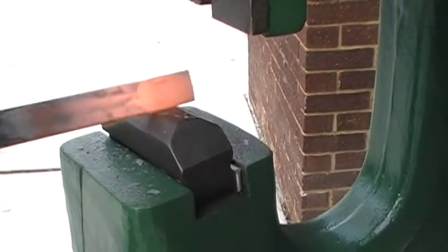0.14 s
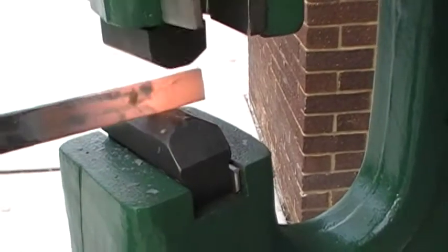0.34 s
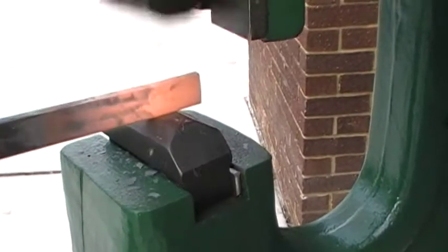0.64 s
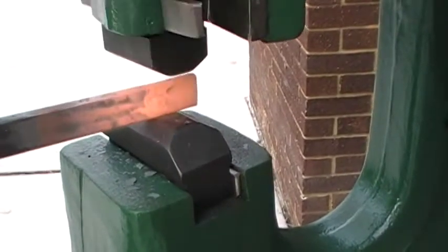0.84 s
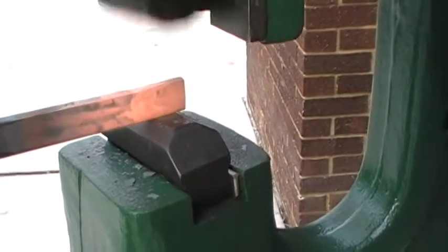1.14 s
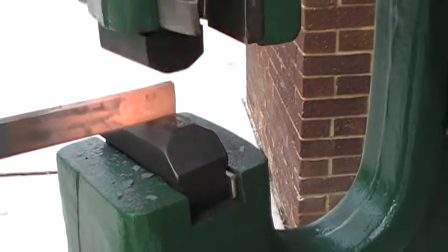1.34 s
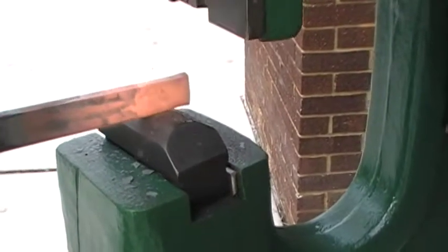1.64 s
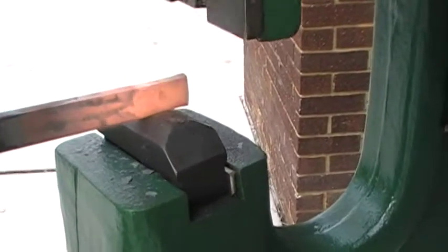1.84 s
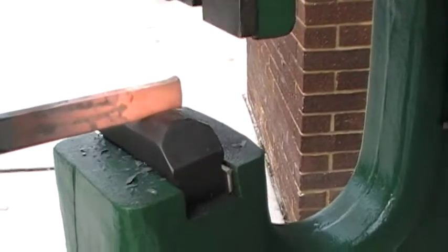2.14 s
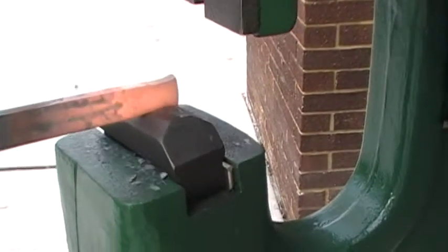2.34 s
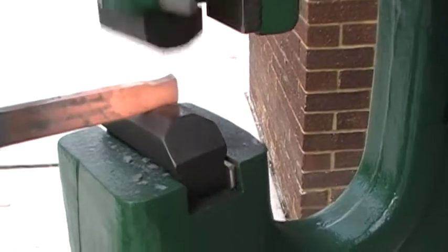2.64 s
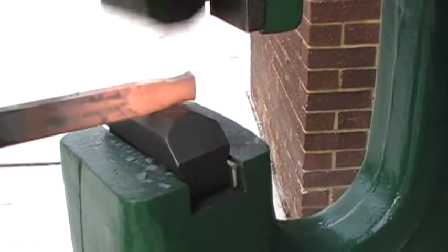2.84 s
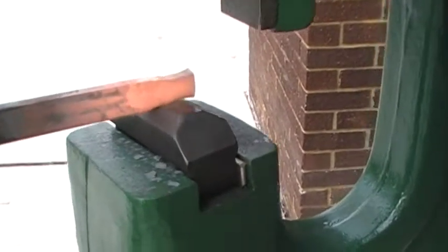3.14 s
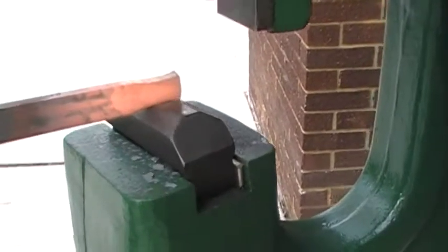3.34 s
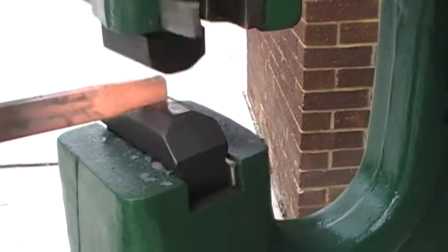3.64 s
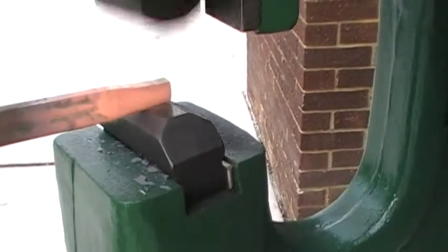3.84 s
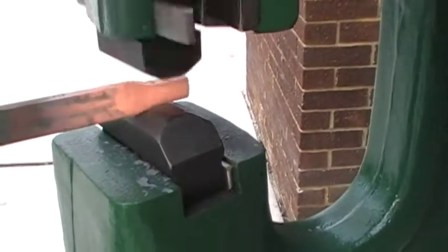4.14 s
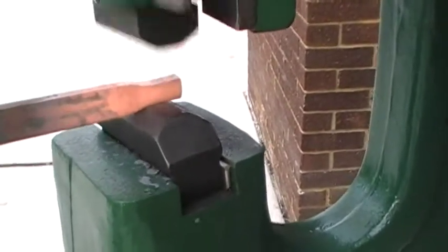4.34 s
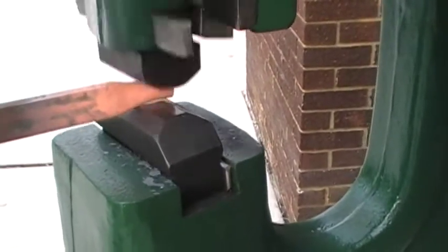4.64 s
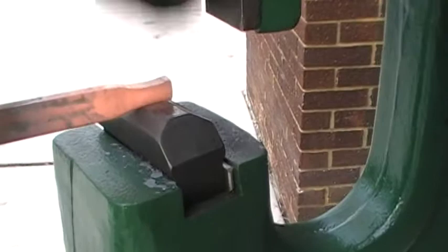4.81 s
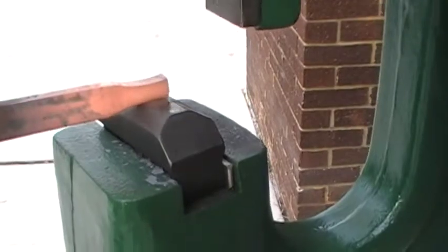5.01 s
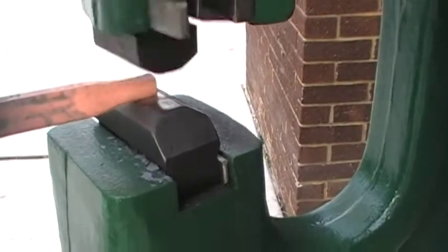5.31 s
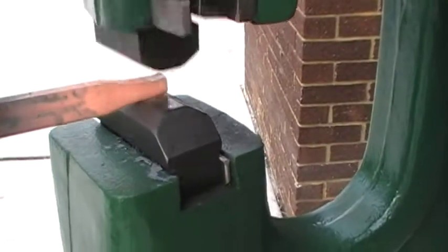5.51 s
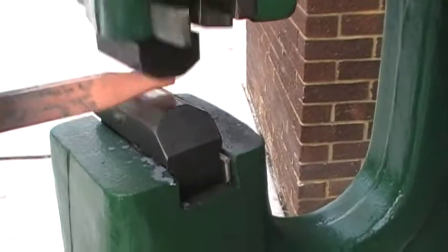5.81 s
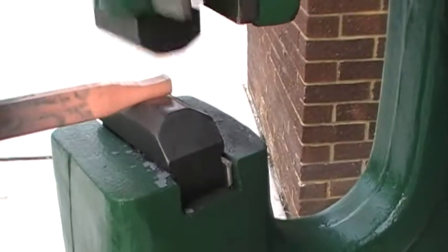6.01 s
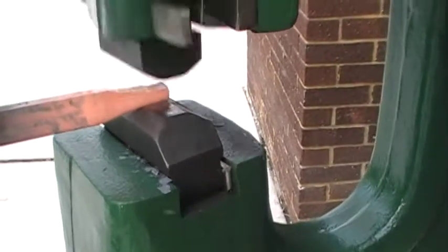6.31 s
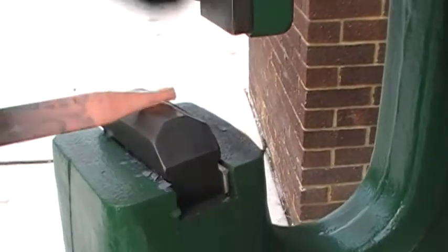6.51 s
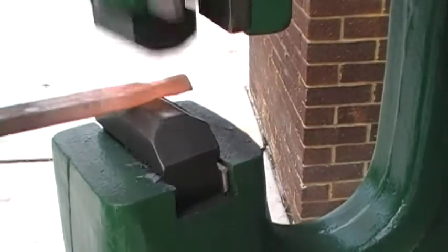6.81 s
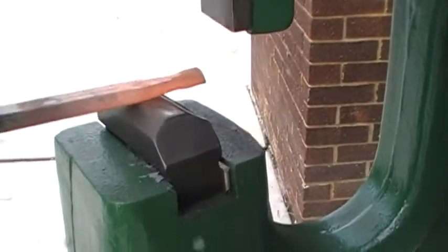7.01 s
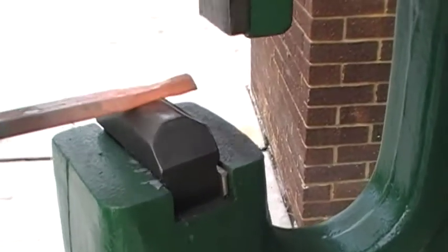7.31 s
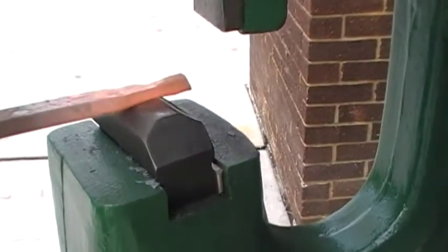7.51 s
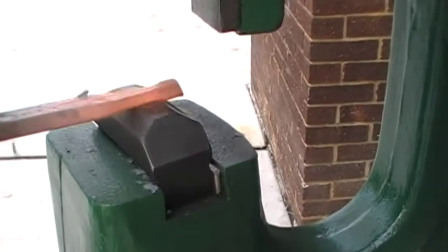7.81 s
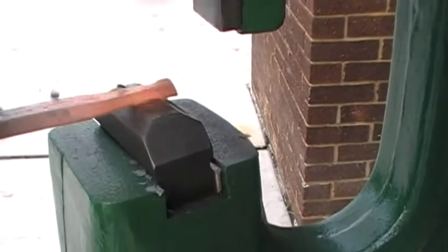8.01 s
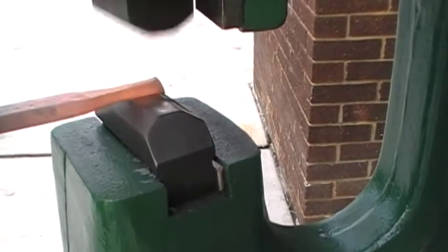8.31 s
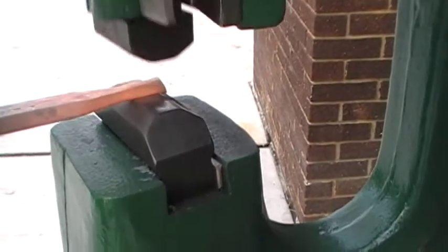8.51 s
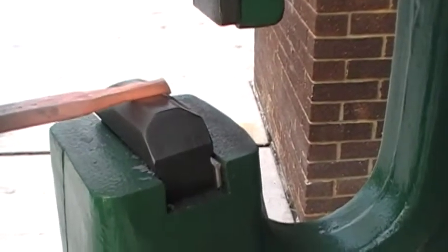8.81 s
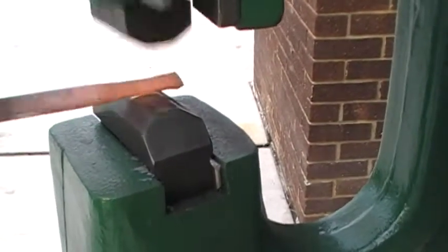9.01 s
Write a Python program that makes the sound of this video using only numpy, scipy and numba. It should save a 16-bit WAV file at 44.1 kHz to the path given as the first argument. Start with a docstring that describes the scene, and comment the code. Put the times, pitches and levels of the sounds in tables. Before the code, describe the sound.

A power hammer is already running, miked closely in stereo. From 0 to 1.5 seconds it lands about four heavy blows a second: broad, noisy metal clangs, short midrange ringing, a brief low rumble and faint hum. A lighter linkage clack comes just before each, with small rattles between. From 1.7 to 2.8 it quickens to nearly six a second and the clacks harden. It slackens around 3 to 3.5, then surges to 4.7 with louder clatter. After easing near 5.2, the longest fast run lasts from 5.5 to 8, about six blows a second, dense and clattering, with hollow low bar thuds, most frequent from 6.6. From 8 to the end near 9.2 the blows space out to four a second and clacks lighten. A muffled drive rush with ticks swells in fast runs; walls answer faintly, peaks are limited and rounded.

```python
"""A belt-driven power hammer forges a hot steel bar: each blow of the die is a noisy metal clang with ringing
frame modes, a short rumble and a hum. Between blows the linkage rattles and clacks, built from chattering noise
bursts, and the bar thuds back on the anvil as short swelling notes, mostly in the fast runs. The drive rushes and
ticks underneath and the walls answer; a close microphone limits the loud hits and rounds off their peaks."""
import sys
import numpy as np
from scipy import signal
from scipy.io import wavfile
from scipy.ndimage import uniform_filter1d, map_coordinates
from numba import njit

SR = 44100
rng = np.random.default_rng(int(sys.argv[2]) if len(sys.argv) > 2 else 0)


def gain_from_db(level_db):
    """Turn a decibel level (scalar or array-like) into a linear amplitude factor."""
    decades = np.asarray(level_db, float) / 20
    return 10 ** decades


def dump(signal):
    """Clip the signal to [-1, 1] and save it as 16-bit WAV at the path in sys.argv[1]."""
    limited = np.clip(np.atleast_2d(signal).T, -1, 1)
    pcm = np.round(limited * 32767).astype(np.int16)
    wavfile.write(sys.argv[1], SR, pcm)


N = 403515
LENGTH = SR // 4  # samples in each single hit


# The hum after a blow, changing as the bar is moved and turned.
# Each row: time in seconds, pitch in Hz, level in dB before a random scatter.
ANVIL_HUM = [(0, 240, -29), (.53, 239, -22), (1.05, 241, -26.5), (1.25, 351, -29), (1.6, 340, -40),
             (1.9, 348, -16.5), (2.35, 349, -32), (2.8, 348, -14.5), (3.3, 343, -27), (3.65, 343, -26),
             (3.9, 348, -37), (4.5, 348, -22.5), (5.2, 348, -32), (5.5, 343, -23.5), (5.9, 353, -41),
             (6.32, 348, -26), (6.44, 298, -22), (6.75, 298, -18), (7.3, 288, -38), (7.72, 294, -13),
             (8.1, 284.5, -28), (9, 270, -28)]


def anvil_hum(blow_s):
    """The anvil and bar hum on after each blow, a sine whose pitch wavers and whose phase differs left to right."""
    waver_share, waver_rate_hz = 0.01, 46
    when, *columns = np.transpose(ANVIL_HUM)
    hum_hz, hum_db = (np.interp(blow_s, when, c)[:, None, None] for c in columns)
    t = np.arange(LENGTH) / SR
    knots = rng.standard_normal((len(blow_s), 24))
    wander = np.array([map_coordinates(k, [t * waver_rate_hz]) for k in knots])[:, None]
    cycles = hum_hz * np.cumsum(1 + waver_share * wander, axis=2) / SR
    hum = np.sin(2 * np.pi * cycles + [[.3], [-.3]])
    fade_out = np.cos(np.pi / 2 * t / t[-1])
    level_db = hum_db + 3.0 * rng.standard_normal(hum_db.shape)
    return hum * fade_out * gain_from_db(level_db - 60 * t / 0.55)


# The die landing on the bar. Each row: time in seconds, clang level in dB.
DIE_BLOWS = [(0.0331, 2), (0.2726, 0.3), (0.5285, 1), (0.786, 1.5), (1.034, 0.1), (1.2763, 0.5),
             (1.5057, 2.1), (1.7167, 3), (1.9061, 2), (2.068, 3.5), (2.232, 4.5), (2.41, 4.5), (2.588, 3.5),
             (2.7725, 2.5), (2.9688, 1.1), (3.1956, -1), (3.4548, 1.5), (3.6219, -1), (3.7859, 5.5),
             (3.9518, 3.5), (4.1235, 1), (4.293, 4.5), (4.4703, 3), (4.649, 2.5), (4.8393, 4.5),
             (5.048, 0.3), (5.2901, -0.2), (5.4912, 5), (5.6449, 7), (5.8118, 6), (5.9766, 5),
             (6.1354, 4.5), (6.3, 2), (6.4555, 6.5), (6.6121, 2.5), (6.7669, 2), (6.9257, 4.5),
             (7.0862, 3.5), (7.2439, 3.5), (7.3969, 2.5), (7.5567, 3), (7.7159, 5.5), (7.868, 0.5),
             (8.0477, 1), (8.2382, .6), (8.474, 0.5), (8.7228, 2), (8.956, 1.5)]
# Colour of a hard contact. Each row: frequency in Hz, relative level in dB.
CLANG_COLOUR = [(59, -22), (100, -9.5), (1250, -0.5), (1580, -2), (1830, -1), (3050, -8.5), (8460, -12),
                (9210, -10.5), (16000, -36.5)]
# How long the clang's noise lasts. Each row: frequency in Hz, 60 dB decay time in seconds.
CLANG_DECAY = [(200, 0.22), (1000, 0.093), (3000, .12), (12000, 0.08)]
# Colour of the anvil and floor shaking. Each row: frequency in Hz, relative level in dB.
ANVIL_COLOUR = [(40, -41), (120, -14), (240, 22), (450, 22), (900, -42.5)]


def die():
    """The blow clangs through ram and frame and shakes the anvil, which answers slowly with a rumble and a hum."""
    s, db = np.transpose(DIE_BLOWS)
    t = np.arange(LENGTH) / SR
    rumble = stereo_noise((len(s), 2, LENGTH), lambda hz, _: colour(ANVIL_COLOUR, hz), size=1024)
    rumble *= gain_from_db(db - 32)[:, None, None] * gain_from_db(-60 * t / 0.044)
    slow_start = 1 - np.exp(-t / 0.011)
    thump = (rumble + anvil_hum(s)) * slow_start
    clang = contact(db, CLANG_COLOUR, CLANG_DECAY, ring_db=-15.0, slow=2.13, chatter_db=0.24)
    return place(s, clang + thump)


# Linkage clacks as the ram is thrown down. Each row: time in seconds, knock level in dB.
LINKAGE_CLACKS = [(0.209, -11.5), (0.469, -10), (0.726, -7.5), (0.979, -8), (1.224, -8), (1.456, -7.5),
                  (1.669, -8), (1.86, -5), (2.033, 0.5), (2.192, 1), (2.366, 0.5), (2.549, -1), (2.729, -3),
                  (2.923, -7.5), (3.142, -8), (3.402, -8.5), (3.583, 1.5), (3.746, 8), (3.91, 1.5),
                  (4.083, 4), (4.251, 3), (4.427, 1), (4.603, -3), (4.793, -10), (4.999, -7.5), (5.23, -9),
                  (5.447, -1), (5.607, 2), (5.768, 4), (5.934, 1), (6.096, 6), (6.257, 9), (6.414, 4.5),
                  (6.574, 3.5), (6.728, 2.5), (6.889, 1.5), (7.049, 3), (7.203, 1.5), (7.36, 2),
                  (7.517, -0.5), (7.68, 2), (7.829, -0.5), (8.004, 0), (8.191, -7), (8.418, -10),
                  (8.662, -10), (8.896, -7.5), (9.119, -10.5)]
# A stronger clack clangs more. Each row: knock level in dB, clang in dB against the knock.
CLACK_HARDNESS = [(-8.5, -11), (-25, -21), (0, 1.5), (6, 3)]
# Colour of a dull contact. Each row: frequency in Hz, relative level in dB.
KNOCK_COLOUR = [(100, -36), (308, -18), (535, -3), (1200, -3), (1720, -5.5), (2860, -10.5), (3470, -25.5),
                (4000, -23), (9610, -29), (16000, -69)]
# How long a knock's noise lasts. Each row: frequency in Hz, 60 dB decay time in seconds.
KNOCK_DECAY = [(200, 0.35), (1000, 0.14), (4000, 0.17), (12000, 0.047)]
# How long the first touch of a clack lasts. Each row: frequency in Hz, 60 dB decay time in seconds.
SNAP_DECAY = [(500, 0.025), (3000, 0.026), (10000, 0.023)]


def clacks():
    """A light clack is one crisp, ringing knock; a hard one clangs first, then its knock builds up over many
    contacts that smother the ring."""
    snap_db, snap_fades = 1, 0.85  # level, then loss per dB of hardness
    s, db = np.transpose(LINKAGE_CLACKS)
    clang_db = np.interp(db, *np.transpose(CLACK_HARDNESS))
    hard_db = clang_db + 7
    knock = contact(db, KNOCK_COLOUR, KNOCK_DECAY, ring_db=-5.5 - 0.94 * hard_db[:, None],
                    slow=0.5 * gain_from_db(1.93 * hard_db), chatter_db=1.0)
    clang = contact(db + clang_db, CLANG_COLOUR, CLANG_DECAY, ring_db=-15.0, slow=4.2, chatter_db=1.5)
    snap = contact(db + snap_db - snap_fades * hard_db, KNOCK_COLOUR, SNAP_DECAY, ring_db=-19,
                   slow=0.1, chatter_db=3.0)
    return place(s - .0015, knock) + place(s, clang) + place(s - .001, snap)


def slack_take_up():
    """The slack is taken up just before each clack, louder and brighter the faster the crank turns."""
    slow_turns = 4  # turns a second of the slow run
    turn_share, share_scatter = 0.094, .012  # how far ahead of the clack, in turns
    knock_db, knock_grows = -17, 1.6  # dB, dB per turn a second
    clang_db, clang_grows = -9, 6.6  # dB against the knock, dB per turn a second
    s, _ = np.transpose(LINKAGE_CLACKS)
    turn = np.diff(s, prepend=s[0] - 1 / slow_turns)
    faster = 1 / turn - slow_turns
    draw = rng.standard_normal((len(s), 3))
    ahead = turn * (turn_share + share_scatter * draw[:, 0])
    knock = knock_db + knock_grows * faster + 1.6 * draw[:, 1]
    clang = clang_db + clang_grows * faster + 3 * draw[:, 2]
    return np.transpose([s - ahead, knock, clang])


# Light contacts of loose linkage parts.
# Each row: time in seconds, knock level in dB, clang in dB against the knock.
LOOSE_RATTLES = [(0.009, -21, -17), (0.258, -14.5, -5), (0.344, -21, -11), (0.418, -30, 6),
                 (0.671, -21, -17), (0.86, -20, 0), (0.892, -40, 15), (0.927, -17.5, -19),
                 (1.027, -17.5, 4), (1.11, -26.5, 2.1), (1.144, -40, 11), (1.384, -34, 5.5),
                 (1.89, -15.5, 13), (2.151, -35.5, 5), (2.29, -15, 7), (2.487, -22.5, 6), (3.04, -37, 12),
                 (3.171, -16, -2), (3.304, -31, 12), (3.683, -39.5, 15.5), (4.182, -30.5, 7),
                 (4.818, -9.5, -9), (5.115, -25, -19), (5.262, -19, 8), (6.191, -26, 6), (6.351, -30, 9),
                 (6.668, -21, 10.5), (8.097, -18, 7), (8.164, -17, 1.1), (8.386, -27, -11),
                 (8.634, -27, -16)]
# How long a light tick lasts. Each row: frequency in Hz, 60 dB decay time in seconds.
TICK_DECAY = [(500, 0.084), (10000, 0.051)]


def rattles():
    """Loose parts touch lightly: a knock that swells slowly, and a clang slower to rise the stronger the knock."""
    s, db, clang_db = np.concatenate([slack_take_up(), LOOSE_RATTLES]).T
    knock = contact(db, KNOCK_COLOUR, KNOCK_DECAY, ring_db=-6.0, slow=3.8, chatter_db=2.5)
    clang = contact(db + clang_db, CLANG_COLOUR, TICK_DECAY, ring_db=-26,
                    slow=0.57 * gain_from_db(1.33 * (db + 33)), chatter_db=4.0)
    return place(s - .003, knock) + place(s, clang)


def linkage():
    """The linkage clacks as the ram reverses, and its loose parts rattle."""
    return clacks() + rattles()


# The bar dropping back on the anvil. Each row: time in seconds, level in dB, centre of the note in Hz.
BAR_THUDS = [(1.792, -19, 520), (2.075, -5, 441), (2.113, -2.5, 450), (2.155, -7, 342), (2.239, -8, 610),
             (2.276, -12.5, 530), (2.46, -15, 238), (2.985, -8, 620), (3.072, -12, 245), (3.308, -14, 300),
             (3.538, -10, 430), (3.659, -15.5, 565), (4.658, -9, 450), (5.498, -4, 463), (6.655, 0, 318),
             (6.768, -15, 452), (6.809, -5, 345), (6.849, -7, 490), (6.919, -1.5, 276), (7.091, -5.5, 447),
             (7.133, 1, 314), (7.168, -3, 300), (7.28, -10, 450), (7.317, -7, 298), (7.447, 6, 284),
             (7.489, -2, 278), (7.544, -13, 600), (7.764, -5.5, 463), (7.917, 2, 290), (7.987, -12, 440),
             (8.032, -10, 450), (8.315, -14, 290), (8.52, -16, 290), (8.6, -24, 290), (8.765, -10.5, 286),
             (8.994, -5, 322), (9.055, -17, 293)]
# Modes of bar and anvil. Each row: frequency in Hz, relative level in dB, 60 dB decay time in seconds.
BAR_MODES = [(247, -15, 0.22), (290, 3.5, 0.062), (348, -21, 0.2), (450, 4.5, 0.097), (539, 16.5, 0.031),
             (572, 8, 0.035), (790, -26, 0.035), (1150, -12, .04)]


def bar():
    """A short hollow note swells and stops as the bar seats: modes near its centre are favoured, with a dull tick."""
    s, db, centre_hz = np.transpose(BAR_THUDS)
    octaves_off = np.abs(np.log2(np.transpose(BAR_MODES)[0] / centre_hz[:, None]))
    feed_db = db[:, None] - 22 * octaves_off
    seating = gain_from_db(-60 * (np.arange(LENGTH) / SR / 0.098) ** 2)
    note = ringing(BAR_MODES, feed_db, 0.0042, scatter_db=2.5) * seating
    tick = contact(db - 14.0, KNOCK_COLOUR, TICK_DECAY, ring_db=-32, slow=0.63, chatter_db=5.5)
    return place(s - .003, note) + place(s, tick)


# The cast frame and ram. Each row: frequency in Hz, relative level in dB, 60 dB decay time in seconds.
FRAME_MODES = [(440, -13, .16), (612, -12, .15), (790, -10, .15), (915, -11, .15), (1098, -10, .12),
               (1184, -8, .1), (1370, -7, .15), (1750, -6, .09), (1976, -8, .16), (2116, -11, .1),
               (2578, -10, .13), (2775, -10, .09), (3240, -14, .09), (3946, -16, .07), (4385, -17, .1),
               (5108, -19, .1), (6200, -23, .1), (7830, -24, .08), (9115, -19, .07)]
# A shock reaches the low, large parts later.
# Each row: frequency in Hz, rise time in seconds (a contact's noise stretches it by its slowness).
SHOCK_RISE = [(300, 0.0037), (1500, 0.004), (5000, 0.0022)]


def contact(db, spectrum, t60, ring_db, slow, chatter_db):
    """Metal on metal: chattering noise dying band by band, and frame modes as far as the contact's colour feeds them."""
    slow = np.reshape(slow, (-1, 1, 1, 1))
    # loose parts touch unevenly
    chatter = gain_from_db(chatter_db * rng.standard_normal((len(db), 1, 1, LENGTH // 64 + 2)))
    # each contact shakes other parts
    tint = gain_from_db(3 * rng.standard_normal((len(db), 1, 65, 1)))

    def crash_gain(hz, s):
        rise = 1 - np.exp(-(s + 0.00026) / (slow * along(SHOCK_RISE, hz)))
        decay = gain_from_db(-60 * (s / along(t60, hz)) ** 0.86)
        return colour(spectrum, hz) * rise * decay * tint * chatter[..., :len(s)]

    crash = stereo_noise((len(db), 2, LENGTH), crash_gain)
    # a casting splits each mode in two
    pairs = np.concatenate([np.multiply(FRAME_MODES, [.994, 1, 1]), np.multiply(FRAME_MODES, [1.007, 1, .8])])
    mode_hz = pairs[:, 0]
    feed_db = ring_db + along(spectrum, mode_hz) - along(CLANG_COLOUR, mode_hz) + np.zeros((len(db), 1))
    ring = ringing(pairs, feed_db, along(SHOCK_RISE, pairs[:, :1]), scatter_db=5.5)
    return gain_from_db(db)[:, None, None] * (crash + ring)


def ringing(table, feed_db, rise, scatter_db):
    """Stereo rows of struck modes, each at a new strength and phase, a little unlike at the two ports."""
    hz, level, life = np.transpose(table)
    t = np.arange(LENGTH) / SR
    envelope = gain_from_db(-60 * t / life[:, None]) * (1 - np.exp(-t / rise))
    modes = envelope * np.exp(2j * np.pi * hz[:, None] * t)
    draw = rng.standard_normal((len(feed_db), 3, len(hz)))
    turn = np.arccos(np.clip(along(STEREO_LIKENESS, hz), 0, 1)) / 2 * draw[:, 2]
    feed = gain_from_db(level + feed_db + scatter_db * draw[:, 0]) * np.exp(.5j * draw[:, 1])
    ports = np.stack([feed * np.exp(1j * turn), feed * np.exp(-1j * turn)], axis=1)
    return (ports @ modes).imag


# How alike the two microphone ports hear. Each row: frequency in Hz, left-right likeness from 0 to 1.
STEREO_LIKENESS = [(150, .25), (350, .76), (1000, .87), (4500, .85), (6000, .72), (8000, .33), (15000, .28)]


def stereo_noise(shape, gain, size=128):
    """Rows of left-right noise, shaped by gain(Hz, s) and alike as the two microphone ports are."""
    hz, t, z = signal.stft(rng.standard_normal(shape), SR, nperseg=size)
    turn = np.arccos(np.clip(along(STEREO_LIKENESS, hz), 0, 1))[:, None] / 2
    mid = z[..., 0, :, :] * np.cos(turn)
    side = z[..., 1, :, :] * np.sin(turn)
    pair = np.stack([mid + side, mid - side], axis=-3) * gain(hz[:, None], t)
    return signal.istft(pair, SR, nperseg=size)[1][..., :shape[-1]]


def colour(spectrum, hz):
    """Gain of a spectrum, with unit power over the whole band."""
    gain = gain_from_db(along(spectrum, hz))
    return gain / np.sqrt(np.mean(gain ** 2))


def along(points, hz):
    """Reads (Hz, value) points on a log frequency axis."""
    f, v = np.transpose(points)
    return np.interp(np.log(hz + 1), np.log(f + 1), v)


def place(times, sounds):
    """Lays stereo sounds out at their times."""
    out = np.zeros((2, N + LENGTH))
    for s, sound in zip(times, sounds):
        start = round(s * SR)
        out[:, start:start + LENGTH] += sound
    return out[:, :N]


# Colour of motor and belt. Each row: frequency in Hz, relative level in dB.
DRIVE_COLOUR = [(25, -42), (80, 7), (200, 6.5), (550, 17.5), (1400, 4), (2600, -9.5), (4500, -20.5),
                (9000, -17.5), (13000, -76), (16000, -62)]
# The drive swelling and sinking. Each row: time in seconds, gain of rush and ticks in dB.
DRIVE_LEVEL = [(0.0, -15.5), (0.12, -28.5), (1.55, -28), (1.76, -27.5), (1.9, -22), (2.24, -23.5),
               (2.52, -26), (3.06, -29), (3.21, -31), (3.6, -24.5), (3.95, -21), (4.18, -27), (5.33, -29),
               (5.68, -21), (6.04, -30.5), (6.73, -26), (7.3, -23.5), (7.749, -19.5), (7.95, -24.5),
               (9.15, -33)]


def drive():
    """Motor, belt and bearings: an uneven rush, and loose parts that keep ticking on the frame."""
    flutter_rate, ticks_per_s = 25, 25
    s, db = np.transpose(DRIVE_LEVEL)
    knots = rng.standard_normal(round(N / SR * flutter_rate) + 4)

    def uneven(hz, t):
        return colour(DRIVE_COLOUR, hz) * gain_from_db(-5 + 4.2 * map_coordinates(knots, [t * flutter_rate]))

    # three places on the frame, each ticking at random moments
    ticks = (rng.random((3, 1, N)) < ticks_per_s / SR) * gain_from_db(0.75 * rng.standard_normal((3, 1, N)))
    spots = contact(np.full(3, -14.), KNOCK_COLOUR, TICK_DECAY, ring_db=-8, slow=0.45, chatter_db=7.5)
    rattle = signal.fftconvolve(ticks, spots, axes=2)[..., :N].sum(axis=0)
    rush = stereo_noise((2, N), uneven, size=512)
    return gain_from_db(np.interp(np.arange(N) / SR, s, db)) * (rush + rattle)


# How long the walls answer. Each row: frequency in Hz, 60 dB decay time in seconds.
SHOP_DECAY = [(200, 0.42), (2000, 0.39), (10000, 0.31)]


def shop(x):
    """The walls answer, each frequency dying at its own speed."""
    tail = stereo_noise((2, SR // 2), lambda hz, t: gain_from_db(-60 * t / along(SHOP_DECAY, hz)))
    delayed = np.pad(x, ((0, 0), (600, 0)))  # samples
    return signal.fftconvolve(delayed, tail / np.linalg.norm(tail[0]), axes=1)[:, :N]


def scene():
    """Hammer, bar, walls and drive."""
    hits = linkage() + die() + bar()
    return hits + gain_from_db(-21.5) * shop(hits) + drive()


@njit
def follow(level, attack, release):
    """A level detector that rises fast and falls slower."""
    out = np.empty_like(level)
    state = 0.0
    for i in range(len(level)):
        state += (level[i] - state) * (attack if level[i] > state else release)
        out[i] = state
    return out


def low_pass(x):
    """Removes everything above the highest recorded frequency."""
    return signal.sosfilt(signal.butter(12, 16470, fs=SR, output="sos"), x)


def record(dry):
    """The microphone drops the bass of the air but feels the floor shake, each capsule in its own way.
    The limiter lags a moment behind each hit, and the input stage rounds off the peaks."""
    attack_s, release_s = .0006, .015
    thin = signal.sosfilt(signal.butter(3, 200, "high", fs=SR, output="sos"), dry)
    level = follow(np.abs(thin).max(axis=0), 1 / (attack_s * SR), 1 / (release_s * SR))
    shake = signal.sosfilt(signal.butter(2, 140, fs=SR, output="sos"), rng.standard_normal(dry.shape))
    shake_level = uniform_filter1d(level, size=1300) + 0.011  # follows the hits, over a steady floor
    felt = thin + gain_from_db(-18.5) * shake_level * shake
    limited = felt / (1 + (level / gain_from_db(-0.5)) ** 6) ** (1 / 4.64)
    clipped = limited / (1 + np.abs(limited / .95) ** 3) ** (1 / 3)
    # the top of the band
    finished = signal.sosfiltfilt(signal.butter(10, 16000, fs=SR, output="sos"), clipped)
    return low_pass(finished)


dry = scene()
out = record(dry)
dump(out)
```